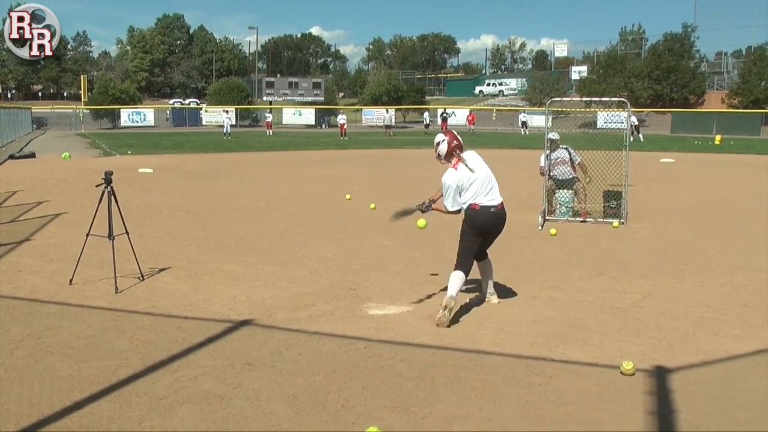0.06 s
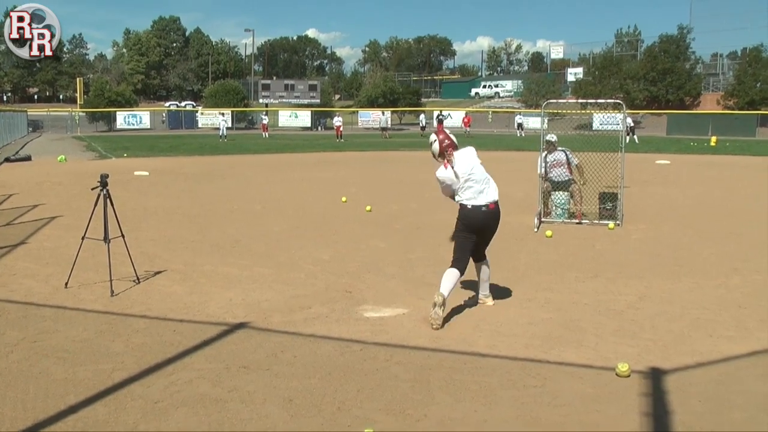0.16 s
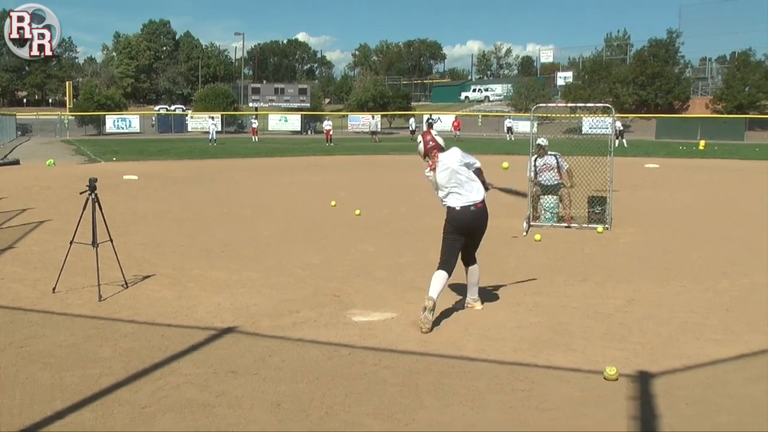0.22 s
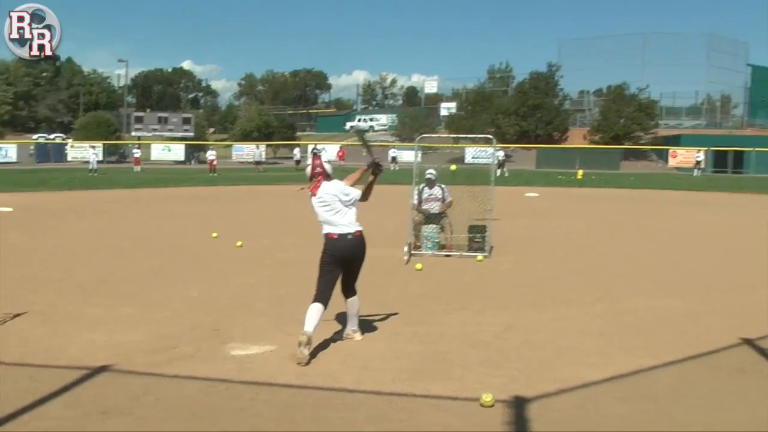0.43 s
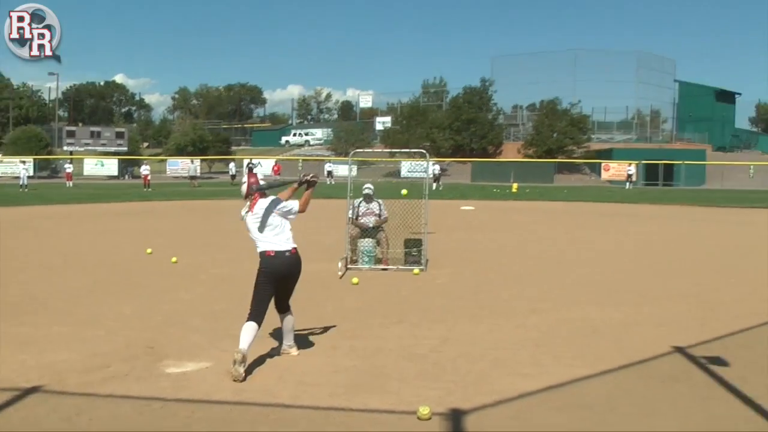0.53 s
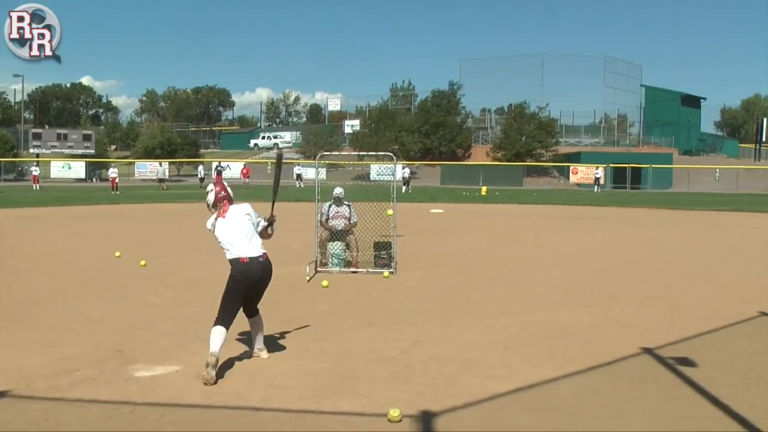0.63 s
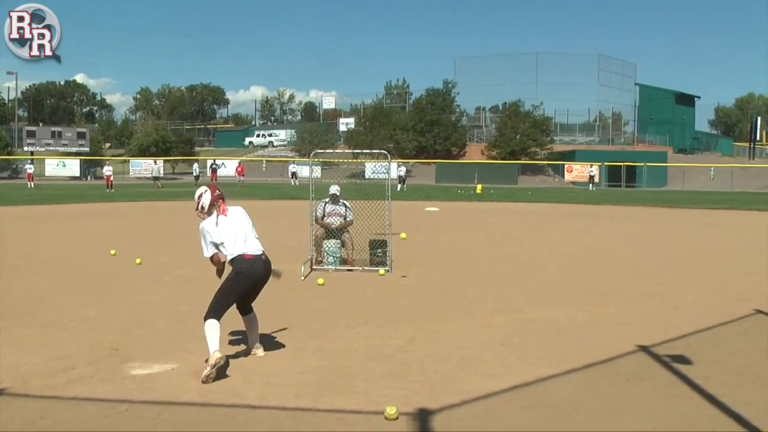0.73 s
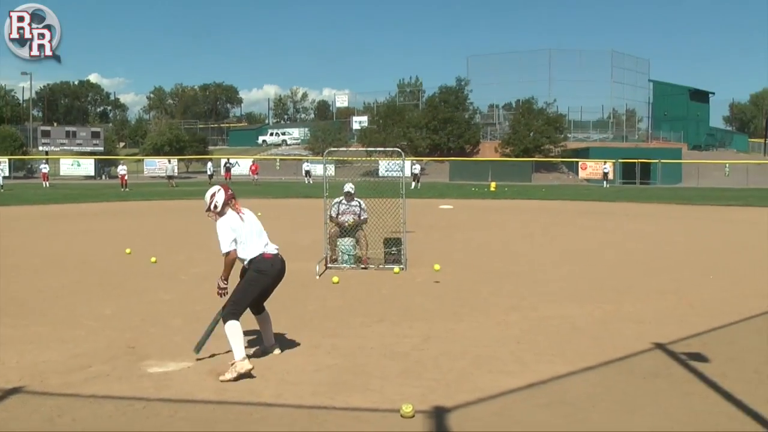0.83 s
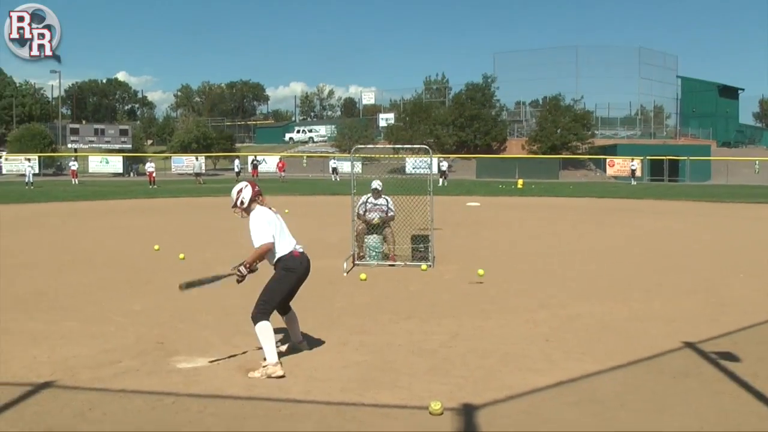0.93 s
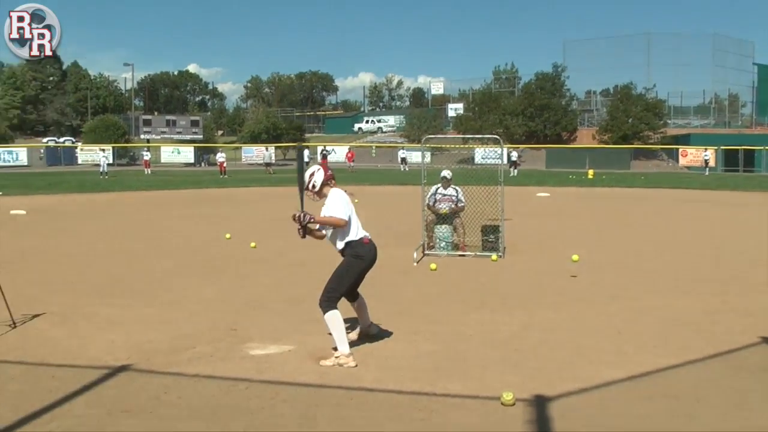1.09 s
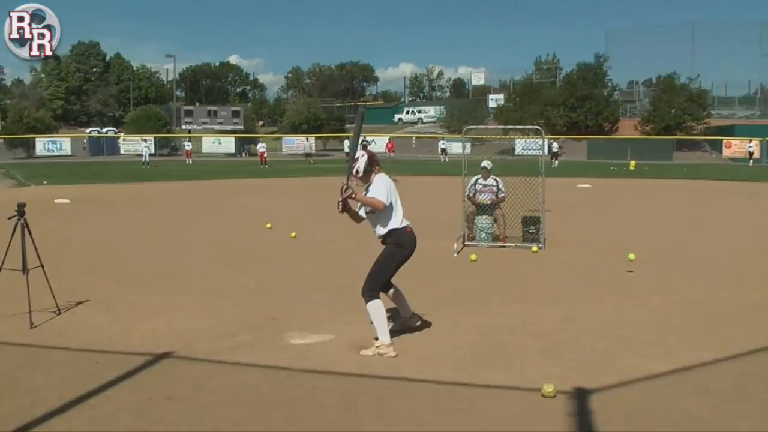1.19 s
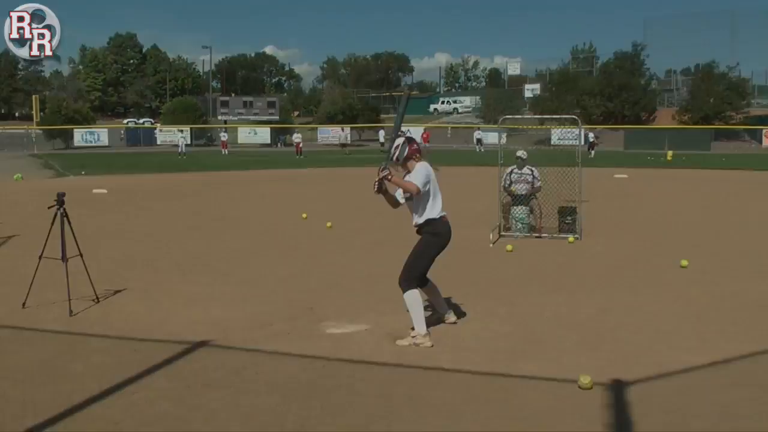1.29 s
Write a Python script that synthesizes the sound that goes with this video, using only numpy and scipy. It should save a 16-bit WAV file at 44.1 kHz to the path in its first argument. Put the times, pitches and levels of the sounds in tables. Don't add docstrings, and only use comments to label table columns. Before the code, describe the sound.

One close, overloaded bat hit rings briefly and echoes outdoors; moments later the ball clanks into wire fencing, links jingle and fade, a small thud on dirt follows, over distant motor and traffic hum.

```python
import sys
import numpy as np
from scipy import signal
from scipy.fft import rfft, irfft
from scipy.io import wavfile

SR = 44100
rng = np.random.default_rng(int(sys.argv[2]) if len(sys.argv) > 2 else 0)


def gain_from_db(level_db):
    decades = np.asarray(level_db, float) / 20
    return 10 ** decades


def digitize_waveform(pressure):
    field = np.atleast_2d(pressure).T
    bounded = np.clip(field, -1, 1)
    quanta = np.round(bounded * 32767).astype(np.int16)
    wavfile.write(sys.argv[1], SR, quanta)


N = 59535

# (frequency [Hz], level [dB per Hz])
WASH_COLOUR = [(15, -70), (25, -36), (59, -6), (145, -4.5), (175, -28.5), (200, -2.5), (344, -7.5),
               (1520, -21.5), (16000, -61.5)]
# (time [s], level [dB])
DISTANCE_DRIFT = [(0, -1.5), (.3, -0.5), (.6, -3), (.8, -2), (1., -0.5), (1.2, -2), (1.35, -5.5)]
# (frequency [Hz], level [dB])
WHINE_COLOUR = [(1150, -38.5), (1350, -5), (1500, 1), (1620, -10.5), (1800, -37.5)]
# (time [s], level [dB])
WHINE_LEVEL = [(0, -54), (.25, -55), (.55, -57), (.7, -64.5), (.95, -91), (1.1, -62), (1.28, -60.5),
               (1.35, -71.5)]
# (frequency [Hz], level [dB rms])
ENGINE_ORDERS = [(70.0, -51), (140.0, -48.5), (209.9, -51), (279.9, -53.5), (333.8, -57), (349.9, -54),
                 (489.9, -69.5), (689.1, -61), (979.8, -67.5)]
# (frequency [Hz], level [dB])
EXHAUST_COLOUR = [(60, -10.5), (150, 7.5), (350, 5), (500, -14), (720, 5), (1100, -18), (2200, -31.5),
                  (4000, -62)]
# (frequency [Hz], level [dB])
RUN_COLOUR = [(1000, -30), (2000, -2), (3200, -1.5), (5000, -5.5), (8000, -28)]
# (first mode [Hz], second mode [Hz])
WIRE_MODES = [(4135, 11655), (3941, 11095)]
# (time [s], free length [s], level [dB], upper mode [dB])
FIRST_WIRE_SWINGS = [
    (.466, .045, -46, -3),
    (.512, .05, -38, -13),
    (.565, .08, -51, -9),
    (.652, .04, -46, -23),
    (.70, .035, -55, -9),
    (.737, .085, -48, -25),
    (.83, .03, -53, -24),
    (.885, .05, -60, -24),
    (.965, .055, -61, -15),
    (1.105, .03, -59, -30),
]
# (time [s], free length [s], level [dB], upper mode [dB])
SECOND_WIRE_SWINGS = [
    (.5472, .035, -33, -5),
    (.59, .06, -36, -15),
    (.657, .065, -49, -12),
    (.85, .14, -63, -13),
    (1.132, .04, -50, -30),
    (1.19, .06, -63, -30),
]
# (time [s], level [dB])
MESH_SHAKE = [(0.453, -40), (0.468, -35), (.5, -46), (.52, -42), (.545, -48), (0.551, -34.5), (0.576, -51),
              (0.598, -47.5), (.68, -64.5), (.72, -78), (.76, -62.5), (.81, -70.5), (1., -73.5),
              (1.3, -90.5)]
# (frequency [Hz], level [dB per Hz])
MESH_COLOUR = [(700, -38), (1500, -17.5), (2500, -13.5), (4500, -10.5), (7500, -8), (11500, -17.5),
               (12600, -32), (16000, -36.5)]
# (time [s], level [dB], centre [Hz], length [cycles])
CLICK_EVENTS = [
    (.091, -47, 6000, 1.5),
    (.4360, -36, 4000, 1.5),
    (.4518, -10, 3800, 1.2),
    (.4528, -14, 6500, 1.5),
    (.5475, -26, 9000, 2),
    (.741, -45, 6000, 1.5),
    (.772, -43, 7500, 1.5),
    (1.0095, -43, 7000, 2),
]
# (frequency [Hz], level [dB], t60 [s])
DIRT_MODES = [(306, -2, 0.023), (623, 3.5, 0.014), (996, -9, 0.017)]
# (frequency [Hz], level [dB], t60 [s])
GLINT_MODES = [(2400, -21, .02)]
# (frequency [Hz], t60 [s])
FIELD_DECAY = [(500, 0.43), (1000, .5), (2000, 0.28), (4000, 0.35), (8000, 0.37), (14000, 0.38)]
# (delay [s], level [dB], top [Hz])
FAR_ECHOES = [(.033, -22, 1000), (.045, -15, 950), (.057, -22, 1200), (.070, -16, 950), (.088, -24, 1100),
              (.103, -24, 1100), (.120, -28, 1100), (.200, -30, 850), (.214, -30, 850), (.350, -30, 850),
              (.363, -35, 1500)]
# (frequency [Hz], level [dB], t60 [s])
BARREL_MODES = [(823.3, -2, 0.067), (884, -7.5, 0.094), (1127, -1.5, 0.037), (1293, 2, 0.032),
                (1499, -2, 0.044), (1873, -8, 0.035), (2320, -6, 0.041), (2857, -12, 0.034),
                (4290, -4.5, 0.027), (4817, -7.5, 0.018), (5545, -10.5, .03), (7080, -11.5, 0.037)]
# (frequency [Hz], level [dB per Hz])
SNAP_COLOUR = [(200, -26), (700, -28), (800, -3.5), (1400, 0.5), (3200, -8), (4600, -7), (9000, -12),
               (15500, -30)]

CRACK_S, THUD_S, GLINT_S = .2341, 1.0085, .2795
ECHO_LOW_HZ = 680


def read(points, hz):
    f, value = np.transpose(points)
    return np.interp(np.log(hz + 1), np.log(f + 1), value)


def evened(x):
    return x / np.sqrt(np.mean(x ** 2) + 1e-20)


def add(mix, s, sound):
    part = mix[int(round(s * SR)):][:len(sound)]
    part += sound[:len(part)]


def tint(x, colour):
    gain = gain_from_db(read(colour, np.fft.rfftfreq(len(x), 1 / SR)))
    return evened(irfft(rfft(x) * gain, len(x)))


def hiss(colour, size):
    return tint(rng.standard_normal(size), colour)


def dull(x, hz, kind="low"):
    return signal.lfilter(*signal.butter(2, min(hz, 20000), kind, fs=SR), x)


def slow(rate_hz):
    t = np.arange(N) / SR
    rates = rate_hz * np.linspace(.1, 1, 12)
    return evened(sum(np.sin(2 * np.pi * (f * t + rng.random())) for f in rates))


def modes(table, t):
    return sum(gain_from_db(db - 60 * t / t60) * np.sin(2 * np.pi * (hz * t + rng.random())) for hz, db, t60 in table)


def traffic_wash():
    return gain_from_db(-43 + 0.7 * slow(6)) * hiss(WASH_COLOUR, N)


def fan_whine():
    t = np.arange(N) / SR
    level_db = np.interp(t, *np.transpose(WHINE_LEVEL)) + 2.3 * slow(29)
    return gain_from_db(level_db) * hiss(WHINE_COLOUR, N)


def engine():
    t, fire_hz = np.arange(N) / SR, ENGINE_ORDERS[0][0]
    hum = np.zeros(N)
    for hz, db in ENGINE_ORDERS:
        level = gain_from_db(db + 3 + 1.5 * slow(9))
        hum += level * np.cos(2 * np.pi * hz * t + 0.11 * slow(6))
    since_firing = (fire_hz * t) % 1
    puffs = np.exp(-since_firing / 0.38) * rng.standard_normal(N)
    return hum + gain_from_db(-50.5 + 2.5 * slow(12)) * tint(puffs, EXHAUST_COLOUR)


def distance():
    drift_db = np.interp(np.arange(N) / SR, *np.transpose(DISTANCE_DRIFT))
    drone = engine() + traffic_wash()
    return drone * gain_from_db(drift_db) + fan_whine()


def fence_run():
    since = np.arange(N) / SR - MESH_SHAKE[0][0]
    level = (since > 0) * gain_from_db(-48.5 - 60 * since / 2.03 + 1.5 * slow(25))
    return level * hiss(RUN_COLOUR, N)


def wire_swing(free_s, db, rise_s):
    stop_s = 0.0074
    u = np.arange(0, free_s + 5 * stop_s, 1 / SR)
    swing = gain_from_db(db + 4 - 60 * u / 0.52) * np.minimum(u / rise_s, 1)
    return swing * np.exp(-np.maximum(u - free_s, 0) / stop_s)


def wires():
    out, t = np.zeros(N), np.arange(N) / SR
    fuzz_hz = 70
    for (low_hz, high_hz), swings in zip(WIRE_MODES, (FIRST_WIRE_SWINGS, SECOND_WIRE_SWINGS)):
        since = t - swings[0][0]
        low = (since > 0) * gain_from_db(-57 - 60 * since / 1.59 + 3.8 * slow(29.93))
        high = low * gain_from_db(-15)
        for k, (s, free_s, db, high_db) in enumerate(swings):
            swing = wire_swing(free_s, db, rise_s=.012 if k else .001)
            add(low, s, swing)
            add(high, s, gain_from_db(high_db) * swing)
        for hz, level, fuzz in ((low_hz, low, .45), (high_hz, high, .85)):
            rough = level * (1 + .5 * fuzz * slow(fuzz_hz))
            out += rough * np.sin(2 * np.pi * hz * t + fuzz * slow(fuzz_hz))
    return out


def mesh():
    links_per_s, spread_db, buzz = 2300, 4.5, .8
    struck = rng.random(N) < links_per_s / SR
    ticks = struck * gain_from_db(spread_db * np.minimum(rng.exponential(1, N), 4))
    ticks = ticks * rng.choice([-1., 1.], N)
    rattle = tint(evened(ticks) + buzz * rng.standard_normal(N), MESH_COLOUR)
    run = fence_run()
    s, db = np.transpose(MESH_SHAKE)
    shake_db = np.interp(np.arange(N) / SR, s, db, left=-120, right=-120)
    return run + rattle * gain_from_db(1.5 + 2.5 * slow(70) + shake_db)


def clicks():
    out, t = np.zeros(N), np.arange(-60, 200) / SR
    for s, db, hz, cycles in CLICK_EVENTS:
        bell = np.exp(-(2 * t * hz / cycles) ** 2)
        add(out, s + t[0], gain_from_db(db) * np.cos(2 * np.pi * hz * t) * bell)
    return out


def thud():
    t = np.arange(3000) / SR
    return gain_from_db(-19) * np.minimum(t / 0.00077, 1) * modes(DIRT_MODES, t)


def glint():
    t = np.arange(3000) / SR
    return np.minimum(t / 0.0007, 1) * modes(GLINT_MODES, t)


def field(x):
    hz, t, z = signal.stft(hiss(SNAP_COLOUR, SR // 2), SR, nperseg=256)
    decay = gain_from_db(-60 * t / read(FIELD_DECAY, hz)[:, None])
    tail = signal.istft(z * decay, SR, nperseg=256)[1]
    build_up = np.minimum(np.arange(len(tail)) / (0.018 * SR), 1)
    tail = dull(tail * build_up, ECHO_LOW_HZ, "high")
    return gain_from_db(-14.5) * signal.fftconvolve(x, tail / np.linalg.norm(tail))[:N]


def far_echoes(hit):
    out = np.zeros(N)
    for delay, db, hz in FAR_ECHOES:
        dulled = dull(dull(hit, hz), hz)
        add(out, CRACK_S + delay, gain_from_db(db) * dull(dulled, ECHO_LOW_HZ, "high"))
    return out


def backstop(near, sharp):
    out = np.zeros(N)
    for delay_s, sound in ((.0132, near), (.0122, sharp)):
        add(out, delay_s, gain_from_db(-2.5) * dull(dull(sound, 13600), 510, "high"))
    return out


def crack():
    t = np.arange(6000) / SR
    hold_s, snap_t60, push_s = .003, 0.04, .002
    late = np.maximum(t - hold_s, 0)
    snap = gain_from_db(-5.5 - 60 * late / snap_t60) * hiss(SNAP_COLOUR, len(t))
    tick = dull(rng.standard_normal(len(t)), 5040, "high")
    snap += gain_from_db(-8.5 - 60 * t / .012) * tick
    push = gain_from_db(-34) * (t / push_s) * np.exp(1 - t / push_s)
    contact = gain_from_db(1) * np.minimum(t / 0.00036, 1)
    contact = contact * gain_from_db(-3.5 * np.minimum(late / .005, 1))
    held = gain_from_db(60 * 0.45 * (t - late) / snap_t60) / 2
    ring = contact * modes(BARREL_MODES, t) * held + push
    return ring + contact * snap


def scene():
    hit, sharp = crack(), clicks()
    near, small, kicks = np.zeros(N), np.zeros(N), sharp.copy()
    add(near, CRACK_S, hit)
    add(near, THUD_S, thud())
    add(small, GLINT_S, glint())
    add(kicks, CRACK_S, gain_from_db([18.5]))
    echoes = backstop(near, sharp) + far_echoes(hit) + field(kicks)
    fence = sharp + mesh() + wires()
    return (near + small + echoes + fence + distance())[None]


def band_limit(x):
    return signal.sosfilt(signal.butter(12, 16330, fs=SR, output="sos"), x)


def record(dry):
    noisy = dry + gain_from_db(-80) * rng.standard_normal(dry.shape)
    return band_limit(np.clip(noisy, -.97, .97))


dry = scene()
out = record(dry)
digitize_waveform(out)
```